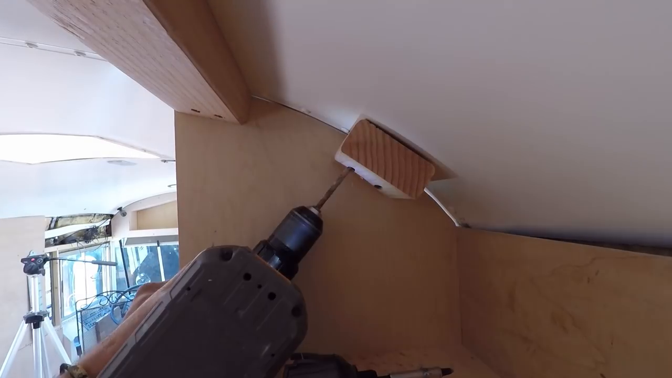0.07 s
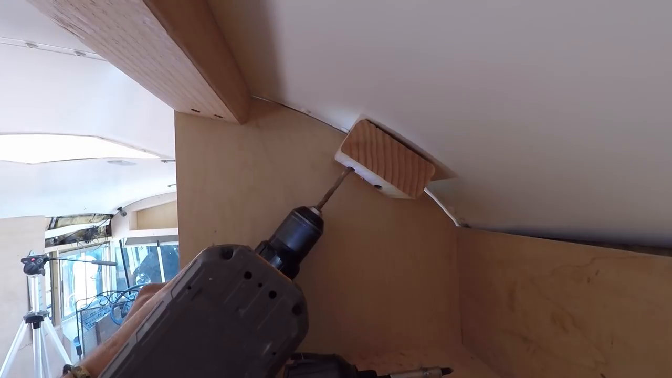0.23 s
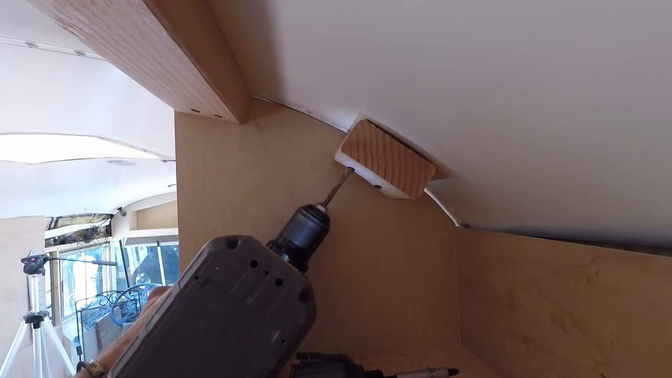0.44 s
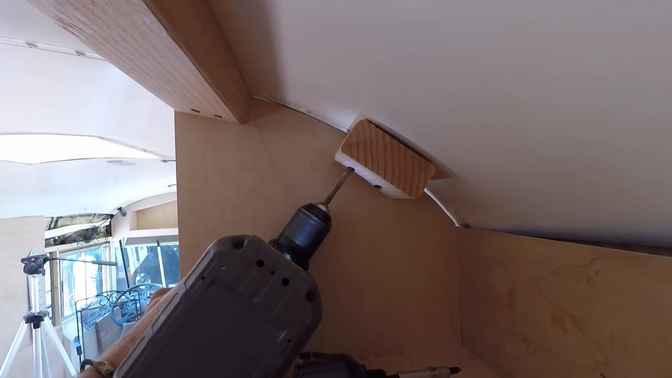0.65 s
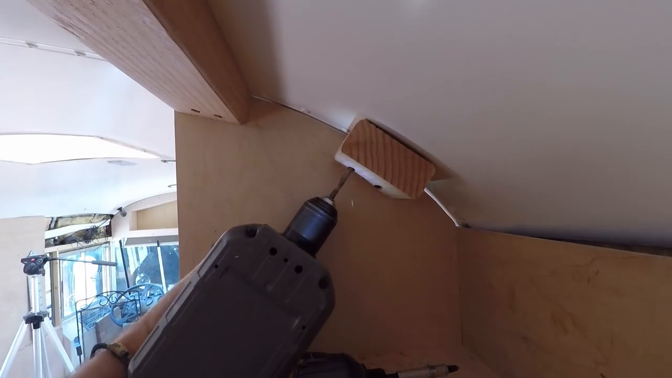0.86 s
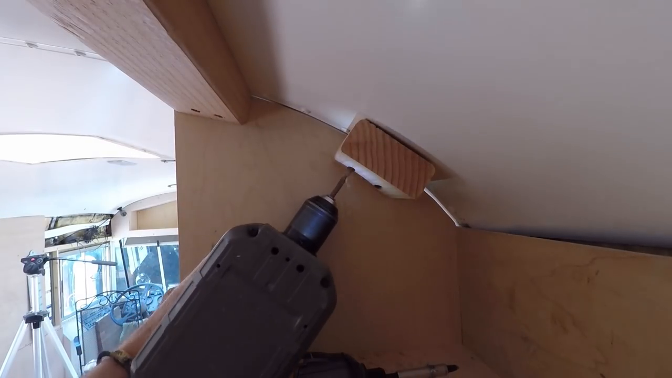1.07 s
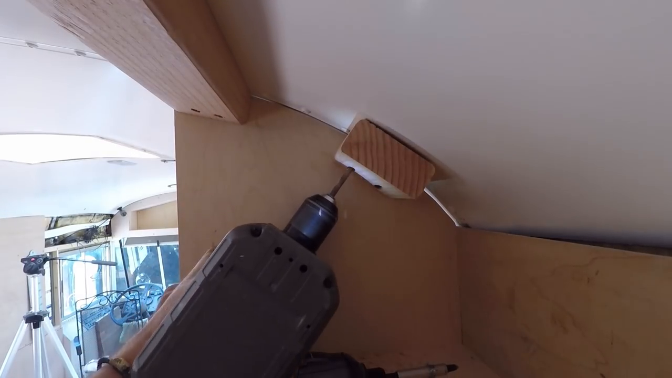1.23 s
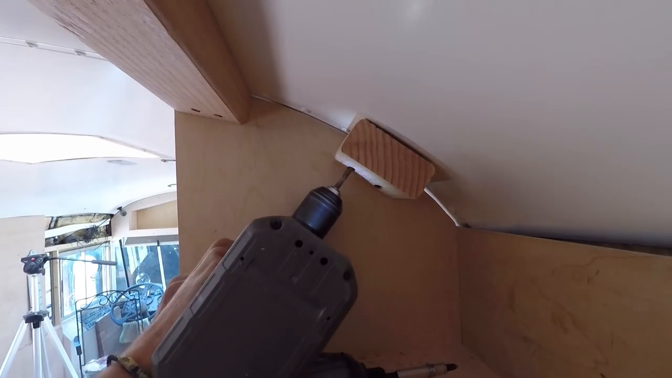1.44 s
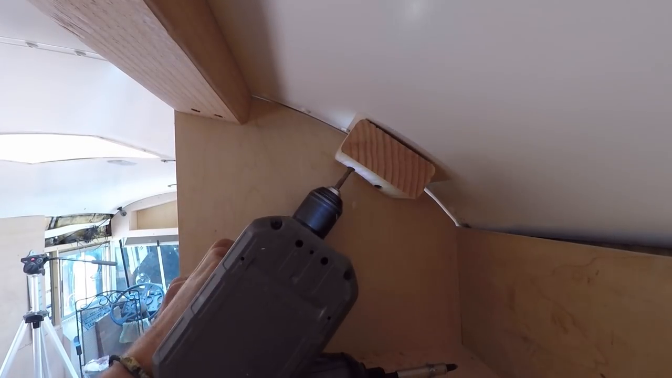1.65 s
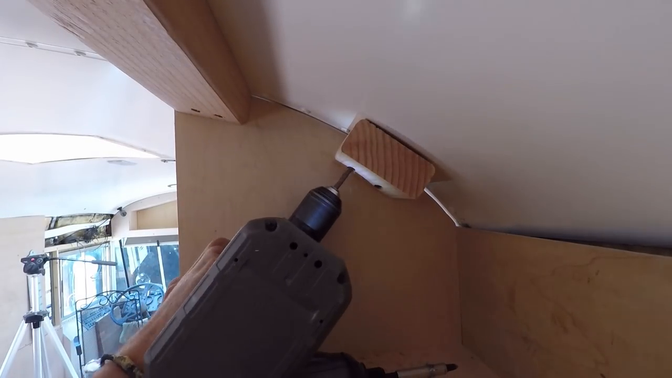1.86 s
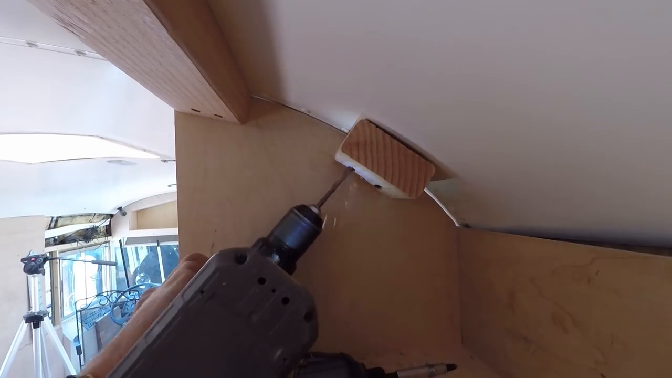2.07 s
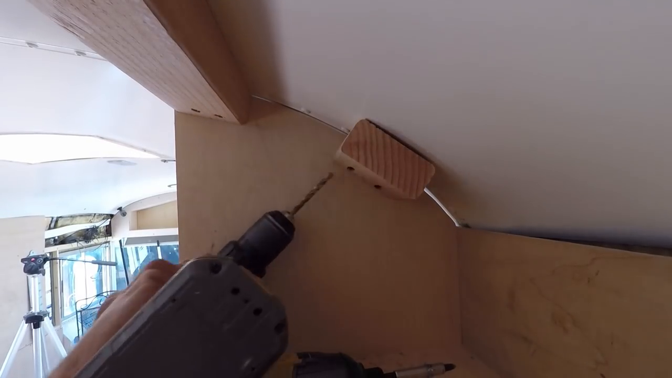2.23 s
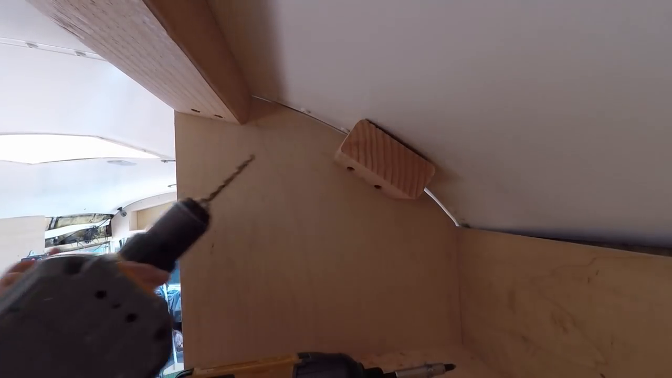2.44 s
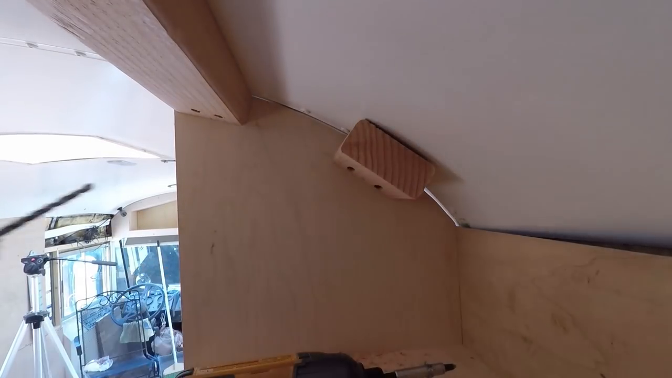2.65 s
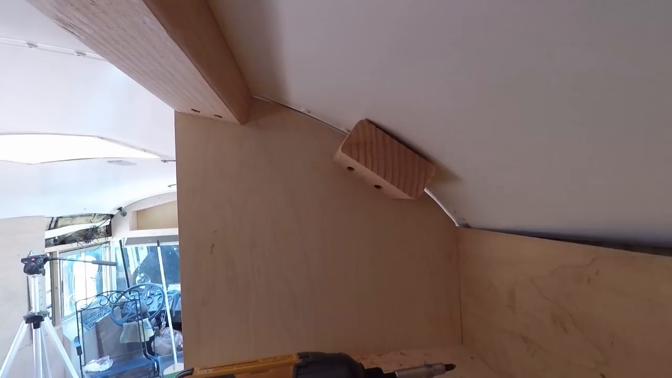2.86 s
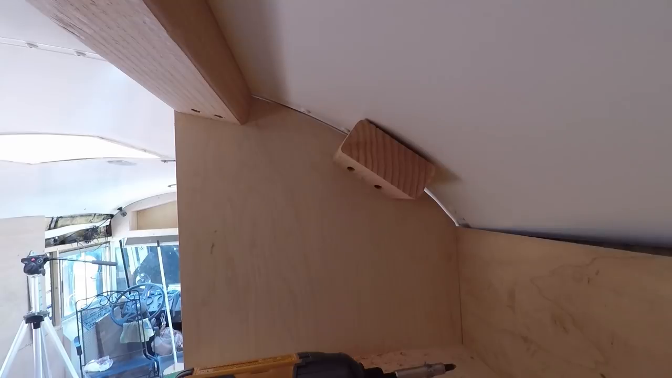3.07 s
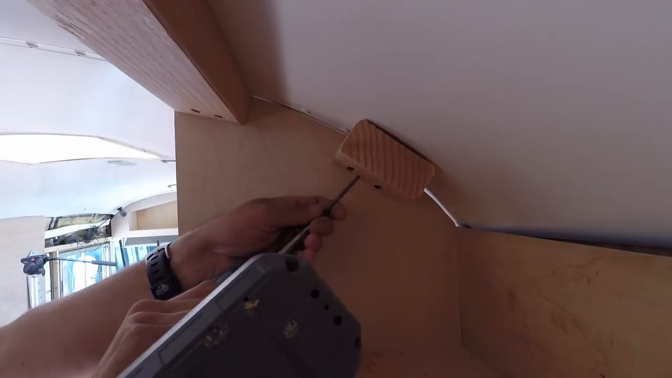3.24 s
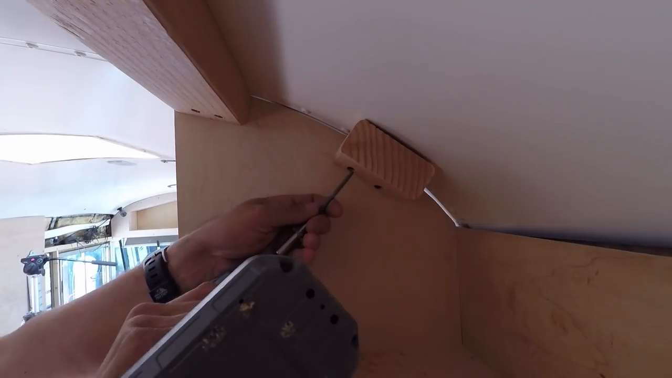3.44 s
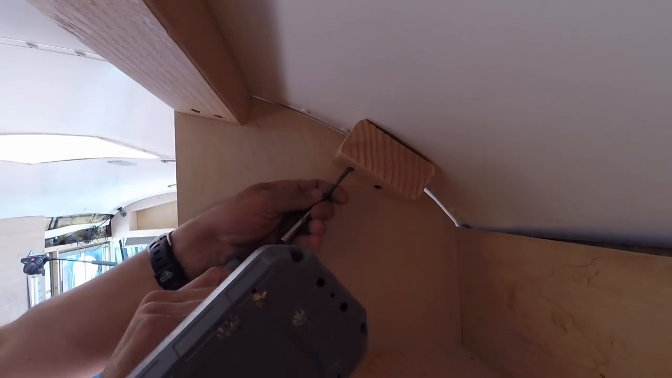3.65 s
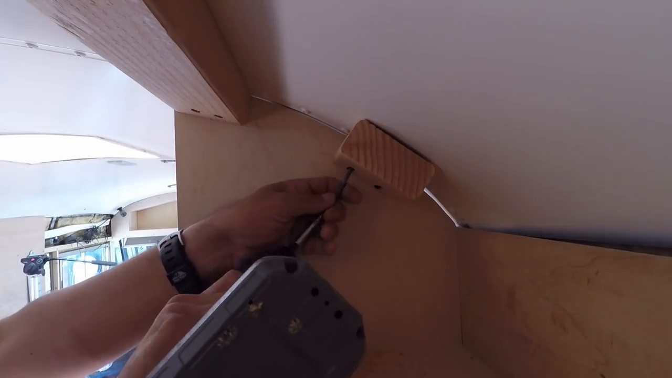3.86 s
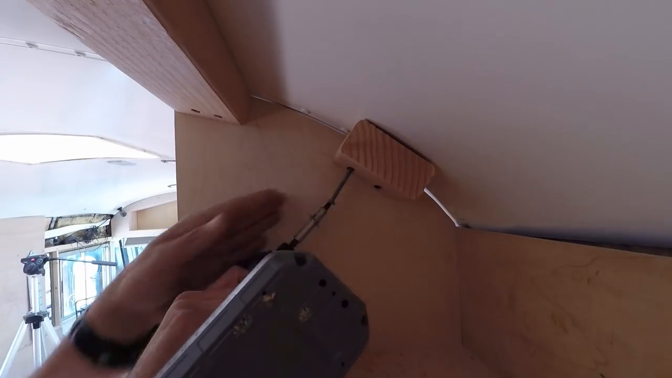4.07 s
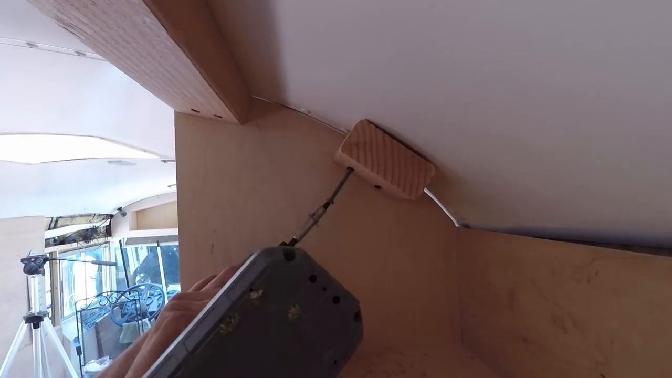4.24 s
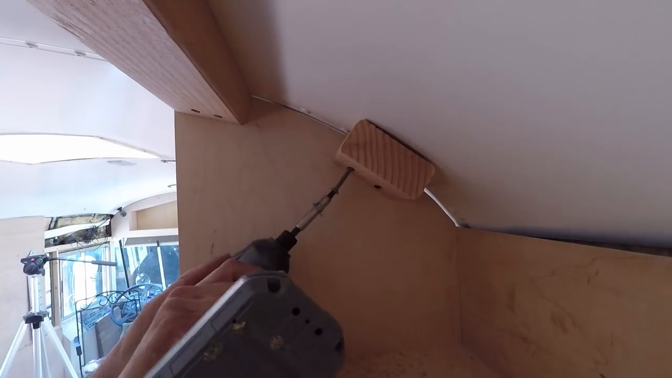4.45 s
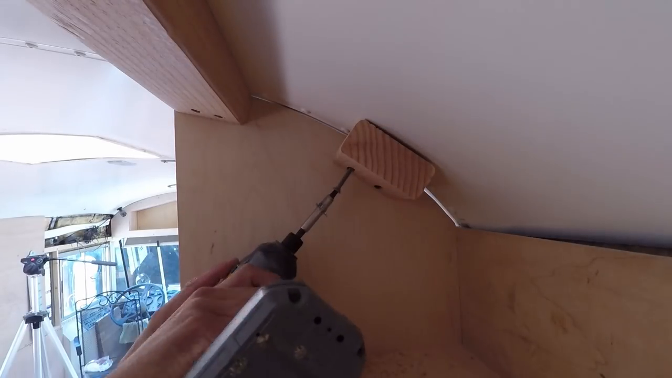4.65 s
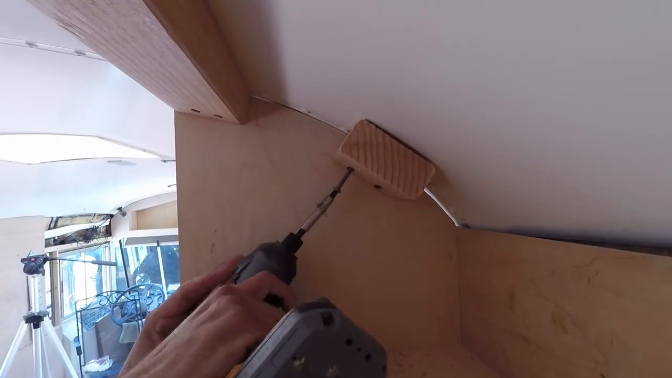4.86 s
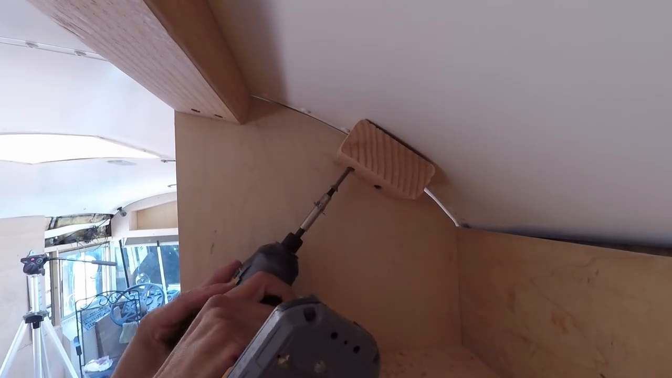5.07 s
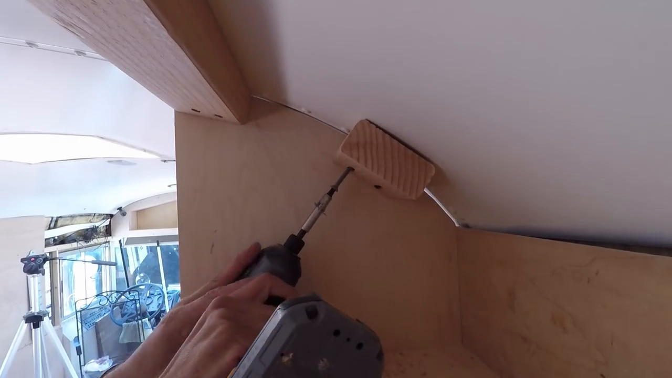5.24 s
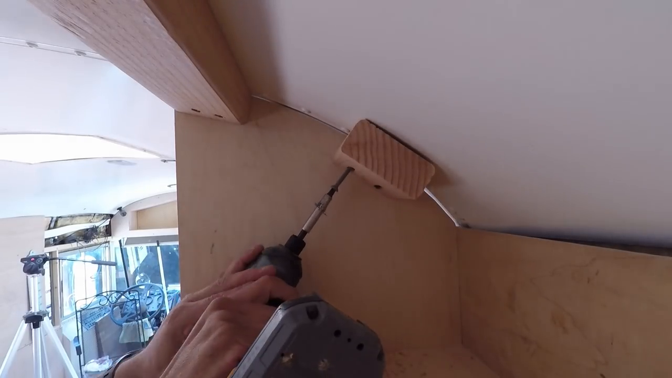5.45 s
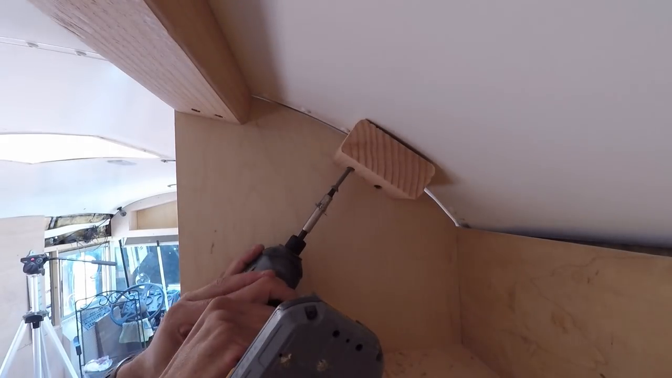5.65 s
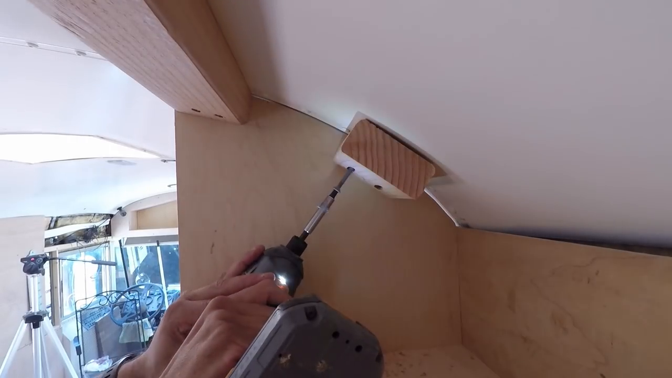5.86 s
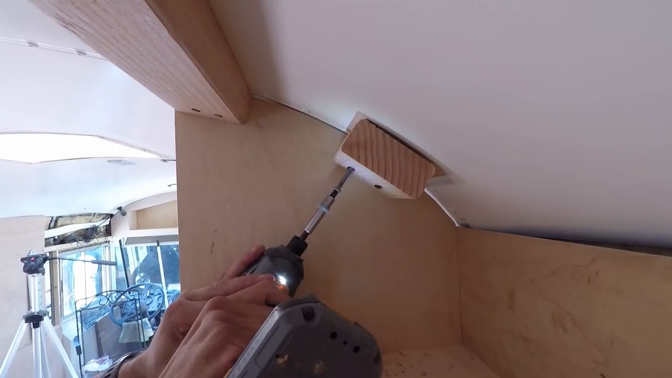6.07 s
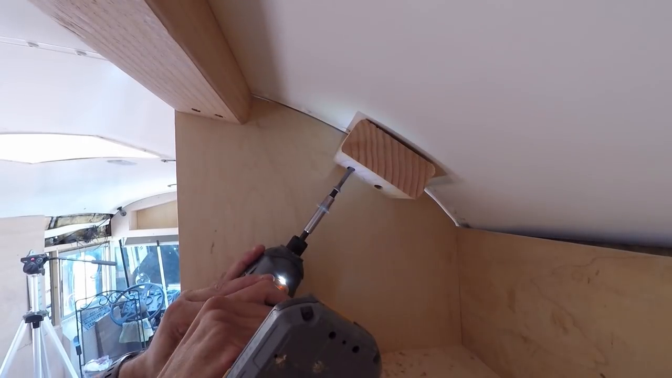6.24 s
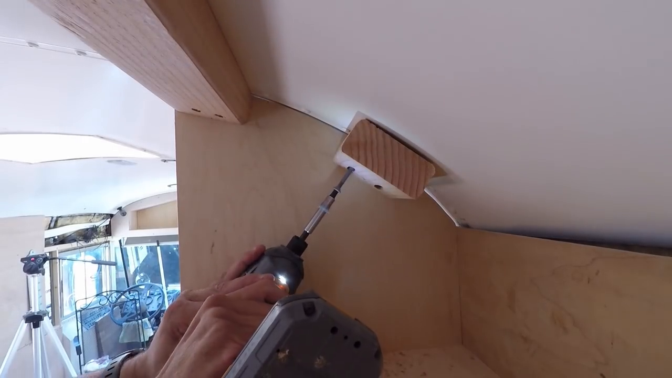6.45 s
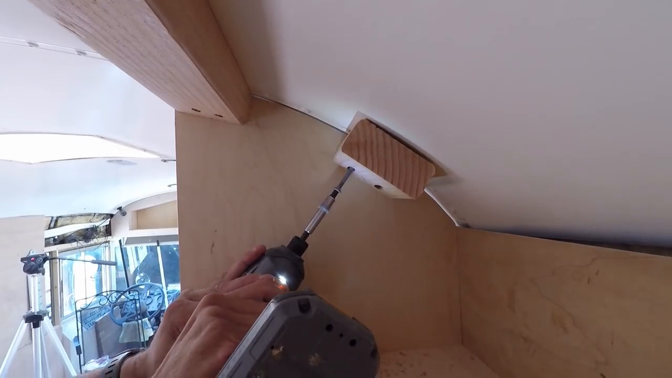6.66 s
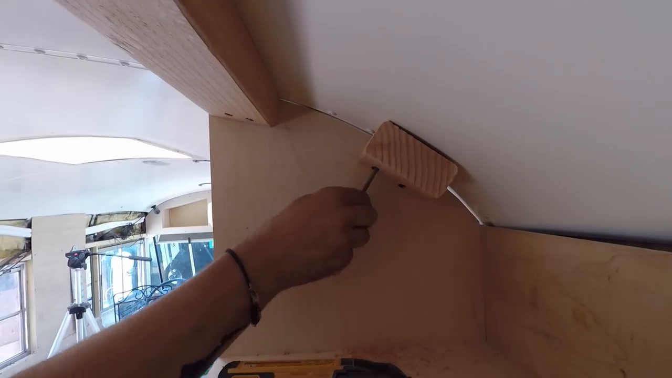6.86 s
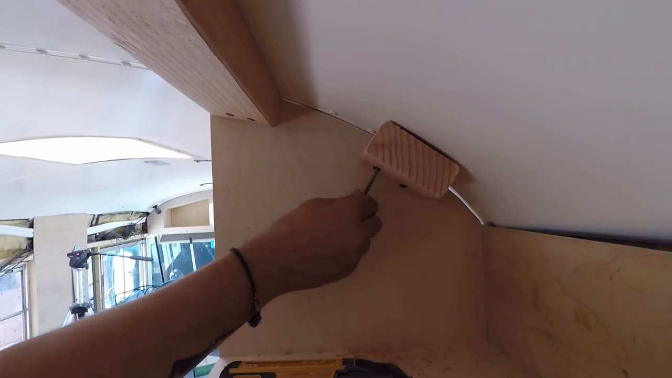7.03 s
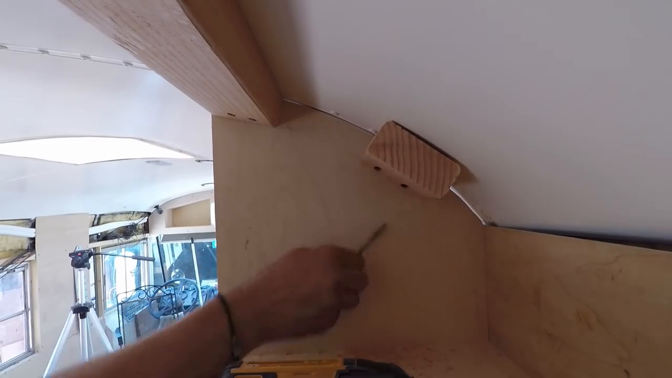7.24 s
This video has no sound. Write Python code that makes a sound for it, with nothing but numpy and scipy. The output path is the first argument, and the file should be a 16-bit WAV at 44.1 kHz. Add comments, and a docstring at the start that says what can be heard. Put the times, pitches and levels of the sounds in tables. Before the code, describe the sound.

From the start a cordless drill runs loudly, close and dry inside a hollow wooden cabinet. Its whine sags around 0.4 s as the bit bites, with rough cutting noise, boxy boom and short squeals near 0.4 and 0.6-0.8 s, then climbs from 0.8 s, dips with a jolt near 1.4 s, and rises to its highest by 2.1 s. At about 2.2 s it winds down with clustered knocks. A near lull holds until 3.0 s, over faint room noise and low hum that swells near 3.9 s. Thumps and a hollow scrape at 3.1 s lead into sliding hands, scuffs, knocks and tiny steel ticks until 5.7 s. At 5.8 s a driver starts under a fading high electronic tone, rises to full speed by 6.1 s, buzzes and rattles steadily, and stops dead at 6.77 s. Light taps at 6.9-7.1 s, a scuff, and a hard clink at 7.2 s finish.

```python
"""A low hum fills the room as a cordless drill whines and tears into a wooden block in a cabinet.
It jerks out of the hole with knocks; hands knock, slide, scuff and tap while a screw is set.
Then a driver winds up under a fading tone, runs the screw in and stops dead; a hard part clinks last.
Tones are trembling partials of motor speed; cutting, friction and blows are filtered noise and decaying modes.
The hollow cabinet booms under the work, and its walls echo the treble."""
import sys
import numpy as np
from scipy import signal
from scipy.fft import rfft, irfft, next_fast_len
from scipy.io import wavfile
from scipy.ndimage import map_coordinates

SR = 44100
rng = np.random.default_rng(int(sys.argv[2]) if len(sys.argv) > 2 else 0)


def file_out(sig):
    """Save sig as 16-bit WAV at sys.argv[1]."""
    # one column per channel
    cols = np.atleast_2d(sig).T
    # limit, then scale
    lim = np.clip(cols, -1, 1)
    pcm = np.round(lim * 32767).astype(np.int16)
    wavfile.write(sys.argv[1], SR, pcm)


N = 322018
TIME = np.arange(N) / SR

# Spectrum of low shaking, drill and driver. Each row: frequency in Hz, relative level in dB.
SHUDDER_SPECTRUM = [(13, -42), (22, -9.5), (50, 0.5), (118, -3), (150, -10.5), (182, 3.5), (241, -20.5),
                    (380, -44), (640, -120)]
# Spectrum of rubbing, hands and scuffs. Each row: frequency in Hz, relative level in dB.
RUSTLE_SPECTRUM = [(290, -5.5), (480, -1), (586, -11), (740, -3.5), (933, -17), (1840, -10), (8210, -24.5),
                   (15000, -35)]

STEEL_TOP_HZ = 6900  # small steel parts radiate little above this
DRIVE_START_S, FULL_TRIGGER_S, DRIVE_STOP_S = 5.779, 6.05, 6.766


def amp(db):
    """Decibels to gain."""
    return 10 ** (np.asarray(db) / 20)


def unit(x):
    """Scale to rms 1."""
    return x / np.sqrt(np.mean(x ** 2) + 1e-20)


def curves(rows):
    """One interpolated value per sample for each column after the time."""
    s, *cols = np.transpose(rows)
    return [np.interp(TIME, s, c) for c in cols]


def wobble(rate_hz):
    """A smooth random curve with rate_hz knots a second."""
    knots = rng.standard_normal(int(N * rate_hz / SR) + 4)
    return map_coordinates(knots, [TIME * rate_hz])


def white():
    """Fresh white noise."""
    return rng.standard_normal(N)


def burst(t, t60_s):
    """White noise dying by 60 dB in t60_s."""
    return rng.standard_normal(len(t)) * amp(-60 * t / t60_s)


def place(x, start_s):
    """A short sound set into the scene at start_s."""
    return np.pad(x, (round(start_s * SR), N))[:N]


def filtered(x, response):
    """x times a complex response of frequency."""
    size = next_fast_len(len(x) + 8192)
    return irfft(rfft(x, size) * response(np.fft.rfftfreq(size, 1 / SR)), size)[:len(x)]


def coloured(x, spectrum):
    """x shaped by (Hz, dB) points on a log frequency axis, at rms 1."""
    f, db = np.transpose(spectrum)
    return unit(filtered(x, lambda hz: amp(np.interp(np.log(hz + 1), np.log(f), db))))


def resonant(x, modes):
    """x heard through (Hz, width Hz, dB) resonances, at rms 1."""
    def response(f):
        return sum(amp(db) * 1j * f * w / (c * c - f * f + 1j * f * w) for c, w, db in modes)
    return unit(filtered(x, response))


def dulled(x, top_hz):
    """x through a second-order low-pass at top_hz, at rms 1."""
    return unit(filtered(x, lambda hz: 1 / (1 + 1j * np.sqrt(2) * hz / top_hz - (hz / top_hz) ** 2)))


def running(start_s, stop_s, t60_s):
    """Gain that rises in 3 ms at start_s and dies away after stop_s."""
    rise = np.clip((TIME - start_s) / .003, 0, 1)
    return rise * amp(-60 * np.maximum(TIME - stop_s, 0) / t60_s)


def turns(hz, flutter):
    """Count of turns of a slightly unsteady shaft."""
    return np.cumsum(hz * (1 + flutter * wobble(70))) / SR


def partial(turn, rough_db):
    """A tone at rms 1 whose strength trembles."""
    return unit(np.sin(2 * np.pi * (turn + rng.random())) * amp(rough_db * wobble(60)))


def lift(hz, modes):
    """Gain of a tone near (Hz, width Hz, dB) resonances; the housing holds in the high treble."""
    top_hz = 9600
    peaks = sum(amp(db) / np.hypot(1, 2 * (hz - c) / w) for c, w, db in modes)
    return (1 + peaks) / (1 + (hz / top_hz) ** 20)


def cabinet(x):
    """x through the cabinet's resonances, whose wood passes little treble, at rms 1."""
    # Each row: frequency in Hz, width in Hz, relative level in dB.
    cabinet_modes = [(311, 7.8, -5), (369.8, 24.6, 6.5), (400, 19, 2.5), (750, 70, -8.5), (807, 28, -6.5),
                     (1122, 39, -5.5), (1508, 49, -10.5), (1815, 70, -20)]
    return coloured(resonant(x, cabinet_modes), [(120, 8), (300, 4.5), (1900, -2.5), (4000, -32.0)])


def block(x, upper_db=0):
    """x through the wooden block; each contact shifts its resonances, upper_db weights all but the lowest."""
    # Each row: frequency in Hz, width in Hz, relative level in dB.
    block_modes = [(389.6, 25.4, 11), (736, 38, -4), (1100, 18, -7.5), (1490, 47, -20.5), (1730, 33, -31)]
    modes = [(hz * (1 + 0.031 * rng.standard_normal()), width, db + upper_db * (k > 0))
             for k, (hz, width, db) in enumerate(block_modes)]
    return dulled(resonant(x, modes), top_hz=1900)  # wood radiates little above


def walls(x):
    """Close wooden walls throw back the treble within a few hundredths of a second."""
    t = np.arange(SR // 16) / SR
    tail = burst(t, t60_s=.05) * (t > .001)
    echo = signal.fftconvolve(x, tail / np.linalg.norm(tail))[:N]

    def wet(hz):
        return np.interp(hz, [700, 1800], [0, .3])
    return filtered(x, lambda hz: np.sqrt(1 - wet(hz) ** 2)) + filtered(echo, wet)


def slips():
    """Friction as tiny uneven ticks, about 220 a second, over a smooth hiss."""
    ticks = unit((rng.random(N) < 220 / SR) * white())
    return ticks + .5 * white()


def room():
    """A low, wavering hum of tone and narrow noise swells once, over room noise and faint rumble."""
    # Each row: frequency in Hz, relative level in dB.
    room_spectrum = [(12, -18), (38, 0.5), (55, 9.5), (77, -55), (98, -34), (1700, -29), (6180, -39),
                     (16000, -53)]
    # Faint rumble in the cabinet. Each row: frequency in Hz, relative level in dB.
    rumble_spectrum = [(25, 15), (90, 1), (210, -14), (450, -11), (620, -24), (4000, -76)]
    hum_hz, hum_db = 69.2, -43.5  # level outside the swell
    swell_s, swell_sigma_s, swell_db = 3.85, 0.5, 13
    level_db = hum_db + swell_db * np.exp(-((TIME - swell_s) / swell_sigma_s) ** 2 / 2)
    drone = coloured(resonant(white(), [(hum_hz, 9.6, 0)]), [(90, 10), (160, -32)])
    hum = unit(partial(turns(hum_hz, flutter=0.01), rough_db=1.5) + amp(-14.5) * drone)
    third_partial = amp(-55.5) * partial(turns(3 * hum_hz, flutter=0.0266), rough_db=8.0)
    noise = amp(-45.5) * coloured(white(), room_spectrum)
    rumble = amp(-40.5) * coloured(white(), rumble_spectrum)
    return amp(level_db) * hum + third_partial + noise + rumble


def drill():
    """Motor and gears whine while the flutes tear wood fibres and shake the cabinet."""
    # Motor sags under load, speeds up when squeezed. Each row: time in seconds, turns per second in Hz.
    motor_speed = [(.05, 262.5), (.27, 261), (.39, 231), (.46, 237), (.51, 257), (.58, 265), (.64, 257),
                   (.73, 259), (.79, 284), (.85, 302), (.9, 328), (.98, 338), (1.12, 342.5), (1.28, 344),
                   (1.35, 334), (1.44, 303), (1.53, 322), (1.73, 327), (1.84, 355), (2.07, 372),
                   (2.13, 361), (2.3, 120)]
    # Each row: multiple of motor speed, level in dB before housing, load and whine curve.
    steady_orders = [(1, -45.5), (3, -47.5), (12, -39), (23, -54), (25, -53), (30, -47), (32, -49.5),
                     (34, -47.5)]
    # Sing only briefly, from 0.88 s until they fade after 1.13 s. Each row: multiple of motor speed, level in
    # dB before housing.
    brief_orders = [(15, -46.5), (16, -49)]
    # Drill resonances lifting partials. Each row: frequency in Hz, width in Hz, lift in dB.
    housing = [(335, 7, 16), (807, 71, 10.5), (2890, 330, 10.5), (3240, 240, 2), (5013, 150, 8.5),
               (8450, 370, 9.5)]
    # Push, as shudder of the cabinet. Each row: time in seconds, level in dB.
    push = [(0.06, -21), (0.8, -25.5), (1.36, -25), (1.44, -17), (1.53, -24.5), (1.79, -24), (2.05, -39.5),
            (2.14, -28.5)]
    # How much the bit snags. Each row: time in seconds, load from 0 to 1.
    snag = [(.24, 0.26), (.35, 0.95), (.8, 0.8), (1.1, 0.45), (1.5, 0.84), (1.9, 0)]
    # Each row: time in seconds, gear whine gain in dB.
    whine_gain = [(.28, 1.5), (.43, -10), (.7, 1.5), (.87, 3), (1.0, -2), (1.25, -3.5), (1.45, 3),
                  (1.8, -1), (1.9, 3), (2.0, -1)]
    # Each row: time in seconds, cabinet boom level in dB.
    boom_level = [(.22, -21.5), (.55, -25), (.85, -21), (1.75, -24), (1.92, -21.5), (2.03, -30.5),
                  (2.17, -21)]
    # Ring of bit and chuck. Each row: frequency in Hz, width in Hz, relative level in dB.
    bit_modes = [(2540, 100, 2), (3200, 50, 2.5), (3704, 280, 5.5)]
    # Bit binding. Each row: start in seconds, end in seconds, frequency in Hz, level in dB.
    squeals = [(0.348, 0.46, 3650, -34), (.61, 0.838, 3210, -32)]
    # Each row: frequency in Hz, relative level in dB.
    cutting_spectrum = [(260, -10), (450, -11), (586, -17.5), (763, 2.5), (971, -15.5), (1140, -7),
                        (1540, -11), (1650, -18), (1910, -4.5), (2730, -10), (3130, -5.5), (4520, -9),
                        (7000, -16.5), (9100, -42), (15400, -120)]
    # Each row: frequency in Hz, relative level in dB.
    chip_spectrum = [(3530, -11.5), (6000, -2), (9740, -1.5), (14000, -11.5), (15700, -16), (16000, -53)]
    cut_db, squeal_db, chip_db = -25, -31.5, -30  # chips at an average push
    chip_db_per_push_db = -0.16  # easing off lets chips fly
    blur_db_per_order = 0.25  # at full load higher partials sink into the noise
    tremor_turns = 0.0094  # at full load

    speed_hz, = curves(motor_speed)
    shudder_db, = curves(push)
    push_db = shudder_db - np.mean(push, axis=0)[1]
    load = np.clip(curves(snag)[0], 0, 1)

    # a loaded bit snags: speed flutters, whine breaks up; high speed flutters a little too
    fast = np.clip((speed_hz - 320) / 20, 0, 1)
    turn = turns(speed_hz, flutter=.0015 + .007 * load + .002 * fast)
    tremor = tremor_turns * load * wobble(280)

    def gears(orders):
        out = np.zeros(N)
        for k, db in orders:
            gain = amp(db - blur_db_per_order * k * load) * lift(k * speed_hz, housing)
            out += gain * partial(k * (turn + tremor), rough_db=2.5 + 3 * load)
        return out
    whine = amp(curves(whine_gain)[0]) * gears(steady_orders)
    whine += running(.88, 1.13, t60_s=.3) * gears(brief_orders)

    # the bit bites harder once per chuck turn; fibres snap at random
    chuck = np.sin(2 * np.pi * turn / 14.5)
    bite = amp(0.1 * load * chuck + 0.81 * wobble(90))

    def fibres(grain_db):
        return white() * bite * amp(grain_db * wobble(1200))
    cutting = amp(cut_db) * coloured(fibres(grain_db=2.0), cutting_spectrum)
    chips = amp(chip_db + chip_db_per_push_db * push_db) * coloured(fibres(grain_db=1.0), chip_spectrum)
    boom_noise = cabinet(fibres(grain_db=4.5))
    boom = amp(curves(boom_level)[0]) * coloured(boom_noise, [(400, -1.5), (760, -3.0), (1150, 1.0)])
    shudder = amp(shudder_db) * coloured(white(), SHUDDER_SPECTRUM)

    bit_ring = sum(amp(db + 1.9 * wobble(20)) * resonant(white(), [(hz, width, 0)])
                   for hz, width, db in bit_modes)
    squeal = amp(squeal_db) * unit(bit_ring * amp(4.1 * load * chuck))
    # each binding squeal sums two noise bands, pulsing with the chuck to different depths
    for pulse_db, t60_s in [(3.1, .11), (5, .12)]:
        binding = sum(amp(db) * running(start, end, t60_s) * resonant(white(), [(hz, 110, 0)])
                      for start, end, hz, db in squeals)
        squeal += unit(amp(pulse_db * chuck)) * binding
    return running(0.05, 2.183, t60_s=0.2) * (whine + walls(cutting + chips) + squeal + boom + shudder)


def blow(s, thud_hz, thud_db, boom_db, clack_db, tick_db):
    """One blow thumps a panel, rings the cabinet and adds the clack and tick of the hard tool."""
    # Low modes of a struck panel. Each row: multiple of thud pitch, mean level in dB, t60 in seconds.
    panel = [(.65, -8, 0.22), (0.998, 2.5, 0.12), (1.4, -5.5, 0.085)]
    # Each row: frequency in Hz, relative level in dB.
    clack_spectrum = [(500, -22), (900, 0.5), (1350, 11), (2100, -2.5), (2850, 5.5), (4200, -10),
                      (8000, -52)]
    # Each row: frequency in Hz, relative level in dB.
    tick_spectrum = [(2000, -6), (4200, 8), (6500, 1.5), (9000, -5), (15000, -14)]
    t = np.arange(SR // 2) / SR

    def level(x):
        return unit(x) * np.sqrt(0.015 / t[-1])  # energy of 15 ms at rms 1
    thud = sum(amp(db + rng.normal(0, 5.6) - 60 * t / t60) * np.sin(2 * np.pi * thud_hz * ratio * t)
               for ratio, db, t60 in panel)
    boom = cabinet(amp(-60 * t / 0.0029) + amp(-12.5) * burst(t, t60_s=0.058))
    clack = coloured(burst(t, t60_s=0.039) + amp(-30.0) * burst(t, t60_s=0.38), clack_spectrum)
    tick = coloured(burst(t, t60_s=0.025) + amp(-39.0) * burst(t, t60_s=0.43), tick_spectrum)
    sound = amp(thud_db) * level(thud) + amp(boom_db) * level(boom)
    sound += amp(clack_db) * level(clack) + amp(tick_db) * level(tick)
    contact = 1 - np.exp(-t / 0.0011)  # wood yields for a moment
    return place(contact * sound, s)


def knocks():
    """Blows of tool and hand: the higher the thud, the more the cabinet booms."""
    # Each row: start in seconds, strength in dB, thud in Hz, clack and tick in dB, all dB before trims.
    knock_rows = [(.811, -11, 64.5, -6, -20), (1.413, -13, 132, -8, -18), (2.159, -26, 60.5, 16, 11.5),
                  (2.179, -13.5, 92, 2.5, -2.5), (2.205, -14.5, 124, -5.5, -12),
                  (3.098, -5.5, 70.7, -15, -22), (3.107, -8, 48, 2, -18), (3.137, -10, 124, 0.5, -17.5),
                  (3.932, -11, 185.4, -43, -47), (4.262, -12.5, 191.5, -27, -24),
                  (4.51, -8, 169.4, -10, -13), (4.78, -7, 168.4, -7, -25.5), (4.798, -14.5, 90, -8.5, -39),
                  (5.793, -27, 120, -1, 15), (5.808, -19, 120, -22, -20), (5.86, -26.5, 100, 13, 1)]
    boom_db_per_octave = 7  # a shorter blow thuds higher and rings the cabinet more
    out = np.zeros(N)
    for s, db, hz, clack_db, tick_db in knock_rows:
        boom_db = db + boom_db_per_octave * np.log2(hz / 150)
        # clack and tick follow the strength
        out += blow(s, hz, db + 2.3, boom_db, db + clack_db - 6.5, db + tick_db - 3.0)
    return out


def hands():
    """Skin and sleeve slide over the tool: each slide rises, holds and dies, and the cabinet follows."""
    # Each row: start, end and attack in seconds, rustle in dB, bump in dB.
    slides = [(2.427, 2.617, 0.027, -61, -72), (3.146, 3.383, .04, -47, -34),
              (3.464, 4.076, 0.15, -43, -34), (4.207, 4.334, 0.089, -38, -28),
              (4.358, 4.49, 0.039, -39, -24.5), (4.574, 4.728, 0.079, -45, -37),
              (4.82, 5.133, 0.048, -56.5, -39), (5.195, 5.33, 0.048, -38, -30),
              (5.338, 5.434, 0.056, -43, -29), (5.521, 5.782, 0.041, -54, -26.5),
              (5.639, 5.665, 0.027, -36, -35), (7.073, 7.3, 0.026, -49.5, -28)]
    # Each row: frequency in Hz, relative level in dB.
    bump_spectrum = [(8, -40), (24, -10.5), (75, -1.5), (97, -17.5), (173, -6.5), (290, -27), (640, -100)]
    rustle, bump = np.zeros(N), np.zeros(N)
    for start, end, attack, rustle_db, bump_db in slides:
        stroke = np.clip((TIME - start) / attack, 0, 1) * running(start, end, t60_s=0.48)
        rustle += amp(rustle_db) * stroke
        bump += amp(bump_db) * stroke
    boom = amp(-6) * np.sqrt(rustle * bump) * cabinet(white())
    grip = amp(0.97 * wobble(25))
    rubbing = coloured(white() + 0.56 * slips(), RUSTLE_SPECTRUM)
    return grip * (bump * coloured(white(), bump_spectrum) + boom + rustle * rubbing)


def drag():
    """A tool dragged a short way over wood: rough noise through resonances makes a hollow squeak."""
    # Each row: start, end and attack in seconds, level in dB.
    strokes = [(2.555, 2.853, 0.08, -65.5), (3.015, 3.069, 0.035, -34.5), (4.78, 4.79, .004, -44)]
    # Squeak of the tool. Each row: frequency in Hz, width in Hz, relative level in dB.
    squeak_modes = [(472, 70, 7), (1570, 45, 13), (2190, 560, 0), (3120, 550, -3)]
    stroke = sum(amp(db) * np.clip((TIME - start) / attack, 0, 1) ** 2 * running(start, end, t60_s=0.11)
                 for start, end, attack, db in strokes)
    return stroke * dulled(resonant(white() * amp(4.2 * wobble(400)), squeak_modes), STEEL_TOP_HZ)


def scuffs():
    """Short scrapes swell and fade: friction rings the block, and steel catches on the screw in tiny slips."""
    # Each row: middle in seconds, boom in dB, block's upper modes in dB, rasp in dB, sigma in seconds.
    scuff_rows = [(2.785, -43, 3, -77, .02), (3.187, -24, 3, -50, 0.019), (3.325, -25, 5.5, -48, 0.016),
                  (3.483, -34, 7, -43.5, 0.01), (3.534, -26.5, -6, -51, 0.015),
                  (3.557, -24.5, 16, -56, 0.007), (3.587, -18, -27, -59, 0.0083),
                  (3.607, -24.5, 3, -53, 0.016), (3.801, -28.5, 10, -62, 0.047),
                  (3.892, -20.5, -30, -66, .009), (3.964, -26, 9, -40.5, 0.016),
                  (4.008, -16, 4, -31.5, 0.016), (4.197, -21, 5, -47, 0.015),
                  (4.363, -19.5, -6, -32.5, 0.015), (4.437, -14.5, -10, -33, 0.0063),
                  (4.464, -22.5, 3, -33, 0.014), (5.27, -34.5, 26, -54, 0.021),
                  (7.183, -18.5, -6, -41, 0.012), (7.207, -11.5, -1.5, -53, 0.01)]
    # Steel on the screw head. Each row: frequency in Hz, width in Hz, relative level in dB.
    grit_modes = [(1900, 250, 0), (2820, 670, 5), (3980, 410, 6), (6040, 520, -12)]
    out = np.zeros(N)
    t = np.arange(SR // 2) / SR
    middle = t.mean()
    rasp = coloured(white() * amp(0.93 * wobble(500)), RUSTLE_SPECTRUM)
    grit = dulled(resonant(slips(), grit_modes), STEEL_TOP_HZ)
    scrape = rasp + amp(-2) * grit
    for s, boom_db, upper_db, rasp_db, sigma in scuff_rows:
        stroke = np.exp(-((t - middle) / sigma) ** 2 / 2)
        boom = block(rng.standard_normal(len(t)), upper_db)
        strength = np.sqrt(np.average(boom ** 2, weights=stroke ** 2))
        out += place(stroke * amp(boom_db) * boom / strength, s - middle)
        out += place(stroke, s - middle) * amp(rasp_db) * scrape
    return out


def ringing(start_s, modes):
    """Modes struck at start_s, each a little unsteady, dying at their own speeds."""
    t = np.maximum(TIME - start_s, 0)
    return (t > 0) * sum(amp(db - 60 * t / t60) * np.sin(2 * np.pi * hz * t + .5 * wobble(150))
                         for hz, db, t60 in modes)


def hard_parts():
    """Thin steel rings on faintly as decaying modes; near the end a hard part clinks and chatters."""
    # Thin steel part. Each row: frequency in Hz, level in dB, t60 in seconds.
    steel_modes = [(1650, -44, 1.0), (1793, -48, 0.6), (1940, -46, 1.0)]
    # Small part struck as the hand lets go. Each row: frequency in Hz, relative level in dB, t60 in seconds.
    clink_modes = [(384, 1.5, 0.16), (778, 0, 0.14), (1100, -6, 0.085), (1530, 6, 0.06), (1570, -18, 0.079),
                   (2180, 0, 0.062), (6000, -25, 0.054)]
    linger = ringing(3.4, steel_modes)
    clink_s = 7.235
    t = np.maximum(TIME - clink_s, 0)
    chatter = coloured(white(), [(900, -6), (1500, 7.0), (3800, -12), (5400, -1.5), (7500, -29), (15000, -49)])
    chatter *= (t > 0) * (amp(-9.0 - 60 * t / 0.041) + amp(-29.5 - 60 * t / 0.42))
    return linger + amp(-14.5) * ringing(clink_s, clink_modes) + chatter


def taps():
    """Light touches of steel tick, ring the block and set the screw or bit ringing briefly."""
    # Each row: start in seconds, boom, tick and ring strength in dB, ring in Hz.
    tap_rows = [(3.555, -29, -54, -57, 4200), (3.91, -30, -61, -46, 4300), (4.159, -29, -53, -46, 4200),
                (4.182, -23, -44, -37.5, 4320), (4.239, -38, -45, -52, 5970), (4.356, -25, -38, -39, 7220),
                (4.468, -24, -33.5, -32.5, 6030), (5.735, -34.5, -59, -62, 4150),
                (6.892, -32, -54, -56, 4180), (7.069, -26.5, -52, -49, 4100),
                (7.109, -12, -36.5, -35, 4240)]
    # Each row: frequency in Hz, relative level in dB.
    tick_spectrum = [(600, -10), (1500, 10), (3000, 7), (6000, -1), (15000, -25)]
    out = np.zeros(N)
    t = np.arange(SR // 4) / SR
    level = np.sqrt(0.013 / t[-1])  # energy of 13 ms at rms 1
    for s, boom_db, tick_db, ring_db, ring_hz in tap_rows:
        boom = block(amp(-60 * t / 0.0017) + amp(-0.5) * burst(t, t60_s=0.043))
        tick = coloured(burst(t, t60_s=0.056), tick_spectrum)
        ring = resonant(burst(t, t60_s=0.0063), [(ring_hz, 90, 0), (0.94 * ring_hz, 130, -4)])
        out += place(level * (amp(boom_db) * boom + amp(tick_db) * tick + amp(ring_db) * ring), s)
    return out


def driver_speed():
    """The speed climbs with the trigger, leaps when it closes and sags as the screw goes in."""
    creep_hz, squeeze_hz_per_s = 240.3, 290
    full_hz, spin_up_s, sag_hz_per_s = 385.6, .035, 3.8
    squeezed_s = np.clip(TIME, DRIVE_START_S, FULL_TRIGGER_S) - DRIVE_START_S
    creep = creep_hz + squeeze_hz_per_s * squeezed_s
    since_s = np.maximum(TIME - FULL_TRIGGER_S, 0)
    return full_hz - (full_hz - creep) * np.exp(-since_s / spin_up_s) - sag_hz_per_s * since_s


def driver():
    """The motor winds up under the speed controller's tone; the spindle jolts and rattles as it turns."""
    # Each row: multiple of motor speed, level in dB at top speed.
    whine_orders = [(1, -23), (4, -37.5), (5, -34.5), (12, -28.5), (20, -42), (24, -45)]
    # Each row: frequency in Hz, relative level in dB.
    gear_spectrum = [(280, -31), (480, -17), (548, -14), (802, 3.5), (943, -19), (1120, -1), (1720, -14.5),
                     (1880, -6), (4150, -12.5), (7140, -15.5), (14700, -25), (16000, -55)]
    # Each row: frequency in Hz, width in Hz, relative level in dB.
    gear_case = [(1880, 190, -1), (3410, 140, -1.5)]
    settle_s = 0.28  # the screw wobbles at first, then runs straight
    knock_db, ring_db = -19.5, -26  # wobble layers at the start
    chopper_hz, chopper_db, chopper_fade_db_per_s = 4072, -24, 61

    speed_hz = driver_speed()
    age_s = np.maximum(TIME - DRIVE_START_S, 0)
    squeezing = TIME < FULL_TRIGGER_S
    loose = np.exp(-age_s / settle_s)
    # level once straight, plus extra at the start
    shudder_db, boom_db, rattle_db = -28.5 + 15 * loose, -21.5 + 1.2 * loose, -24 + 2.5 * loose
    turn = turns(speed_hz, flutter=.001 + .006 * squeezing)
    spindle = turn / 8.59

    # play in the gears blurs the highest partials
    whine = sum(amp(db) * partial(k * turn + 0.00026 * k * k * wobble(250), rough_db=1.5 + 3.7 * squeezing)
                for k, db in whine_orders)
    whine *= (speed_hz / speed_hz.max()) ** 2.1

    # jolts repeat with the spindle: lines at multiples 6 to 23 of its rate, 7 and 8 strongest
    jolts = sum(np.cos(2 * np.pi * (k * spindle + rng.random())) * (2 if k in (7, 8) else 1)
                for k in range(6, 24))
    boom = amp(boom_db) * cabinet(unit(jolts) * amp(0.85 * wobble(30)) + amp(13.0) * white())
    strike = np.exp(-(spindle % 1) / .15)  # a knock at each spindle turn
    boom += amp(knock_db) * loose * block(white() * strike, upper_db=6)

    sway_orders = [(1, -0.5), (3, -1.0), (4, 6.0), (5, 1.5)]  # multiple of spindle rate, dB
    sway = unit(sum(amp(db) * partial(k * spindle, rough_db=3.5) for k, db in sway_orders))
    shudder = amp(shudder_db) * unit(sway + amp(-7.5) * coloured(white(), SHUDDER_SPECTRUM))

    teeth = amp(0.34 * np.sin(2 * np.pi * spindle) + 1.0 * np.sin(2 * np.pi * turn) + 1.06 * wobble(300))
    rattle = amp(rattle_db) * coloured(white() * teeth, gear_spectrum)
    # the gear case rings
    rattle += amp(rattle_db - 12.5) * resonant(white() * teeth, [(7230, 270, 0)])
    rattle += amp(ring_db) * loose * resonant(white() * teeth, gear_case)

    # the controller's tone fades as the trigger closes
    chopper = amp(chopper_db - chopper_fade_db_per_s * age_s) * partial(chopper_hz * TIME, rough_db=-1.0)
    motor = running(DRIVE_START_S, DRIVE_STOP_S, t60_s=0.012) * (whine + boom + shudder + walls(rattle))
    return motor + running(5.773, FULL_TRIGGER_S, t60_s=.05) * chopper


def scene():
    """All layers summed to one signal, the same on both channels."""
    handling = knocks() + hands() + drag() + scuffs() + hard_parts() + taps()
    mono = room() + drill() + walls(handling) + driver()
    return np.array([mono, mono])


def record(dry):
    """Soft limiting rounds off the loudest peaks; nothing passes above the band limit."""
    limit, top_hz = .62, 15600
    clipped = dry / (1 + np.abs(dry / limit) ** 6) ** (1 / 6)
    return np.array([filtered(x, lambda hz: hz < top_hz) for x in clipped])


dry = scene()
out = record(dry)
file_out(out)
```